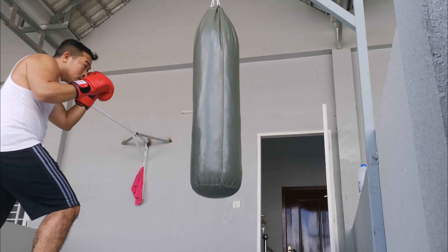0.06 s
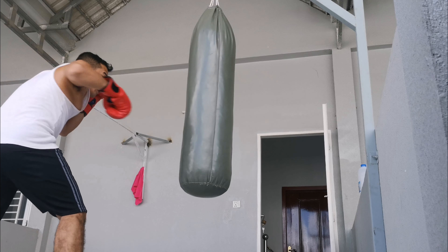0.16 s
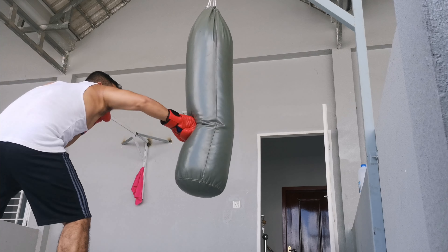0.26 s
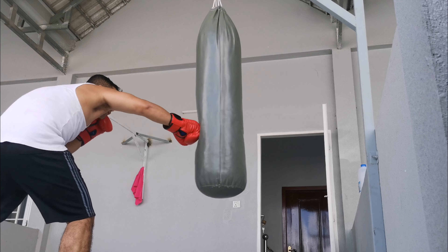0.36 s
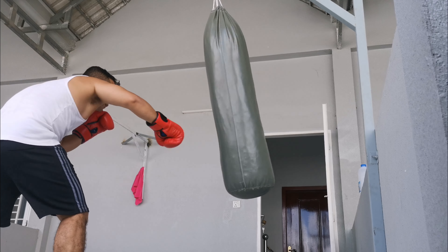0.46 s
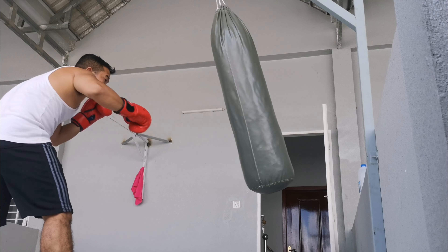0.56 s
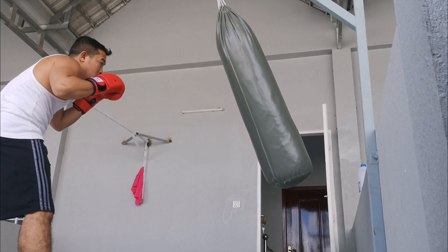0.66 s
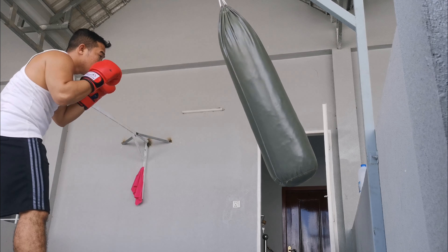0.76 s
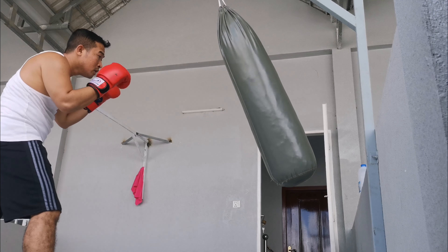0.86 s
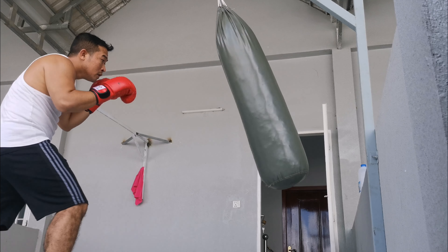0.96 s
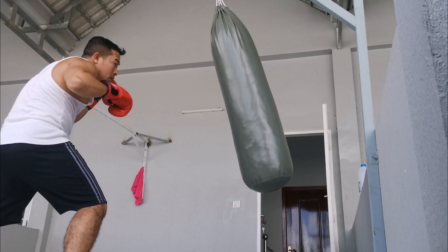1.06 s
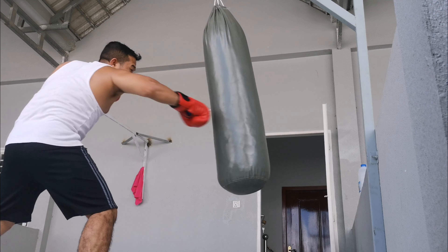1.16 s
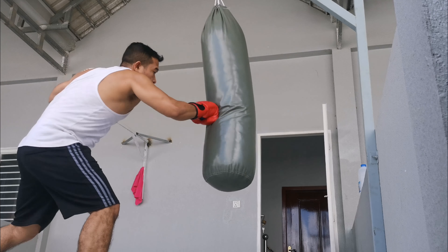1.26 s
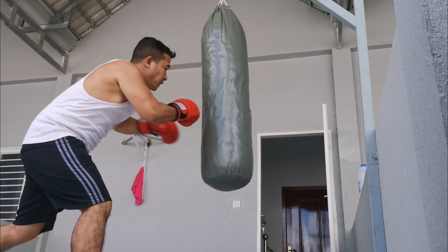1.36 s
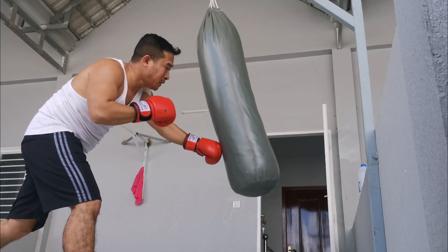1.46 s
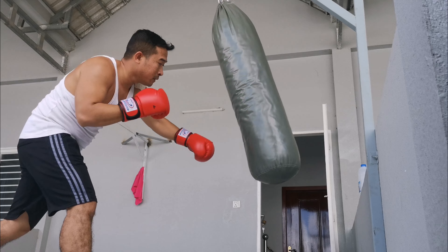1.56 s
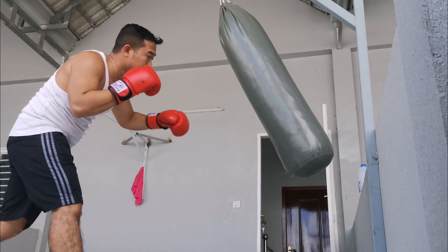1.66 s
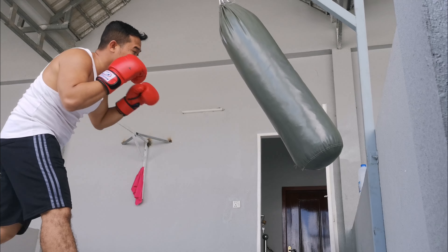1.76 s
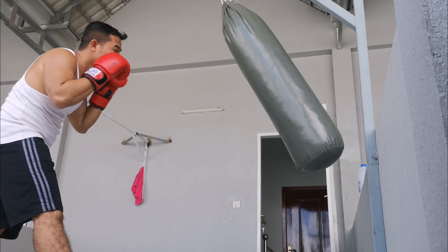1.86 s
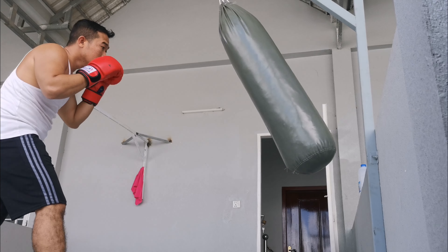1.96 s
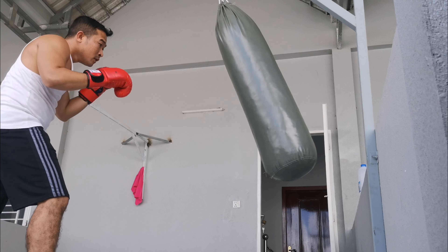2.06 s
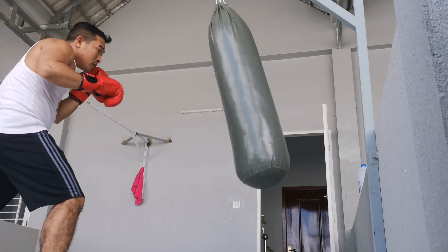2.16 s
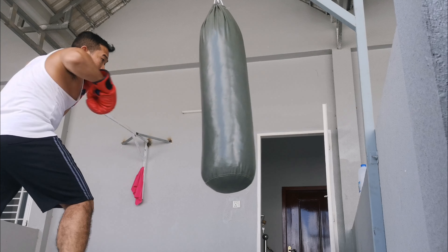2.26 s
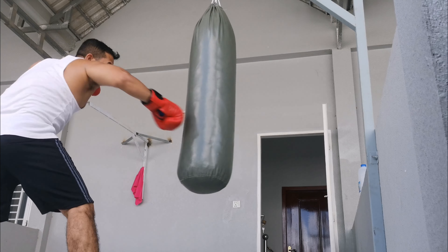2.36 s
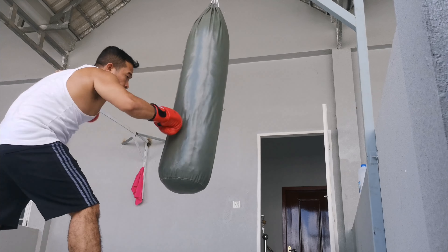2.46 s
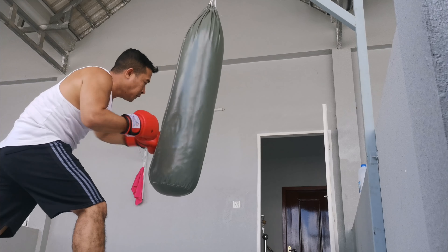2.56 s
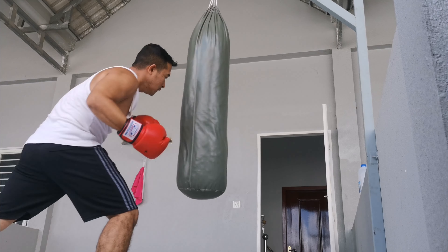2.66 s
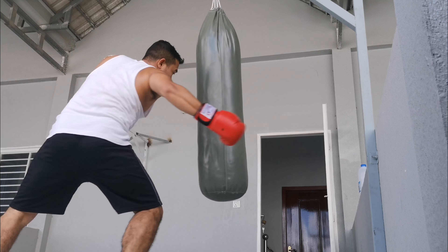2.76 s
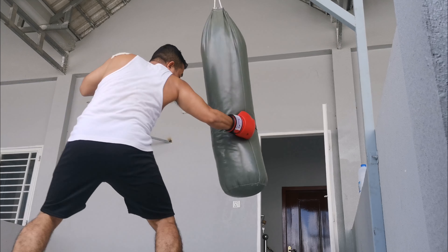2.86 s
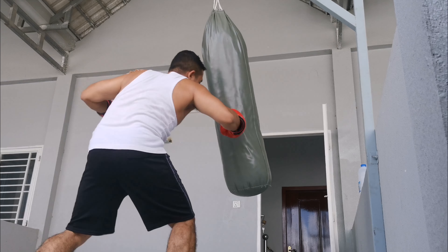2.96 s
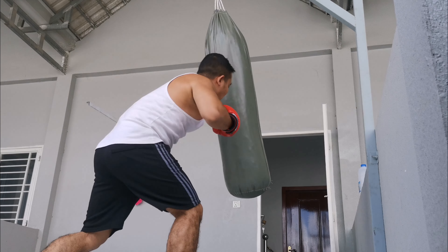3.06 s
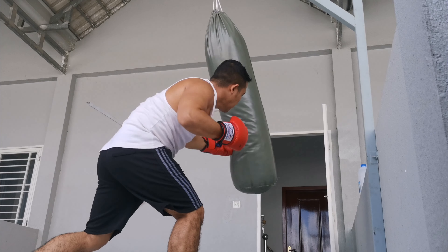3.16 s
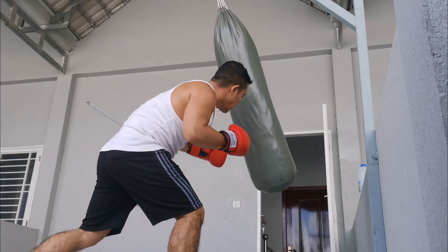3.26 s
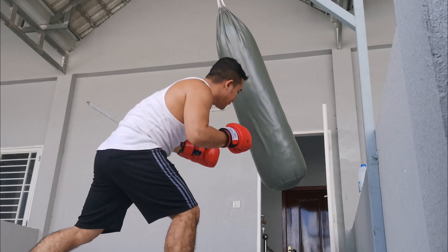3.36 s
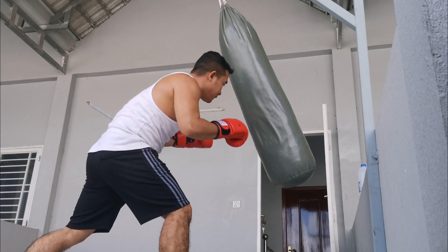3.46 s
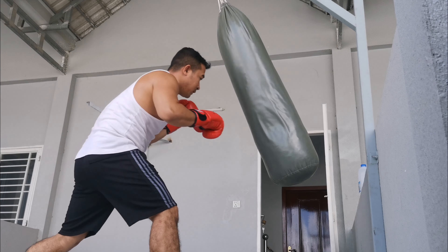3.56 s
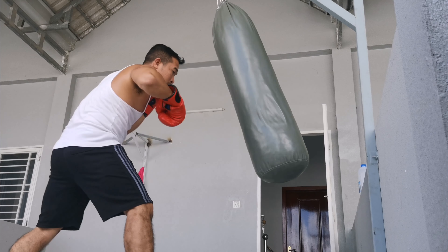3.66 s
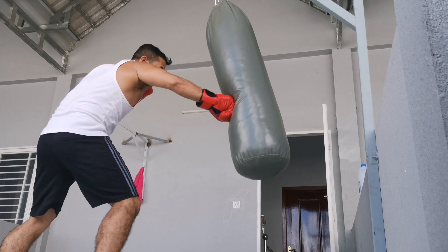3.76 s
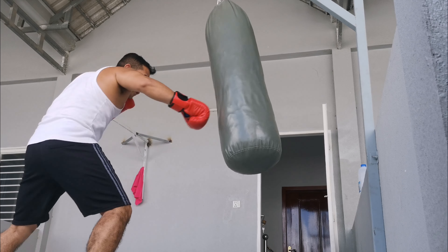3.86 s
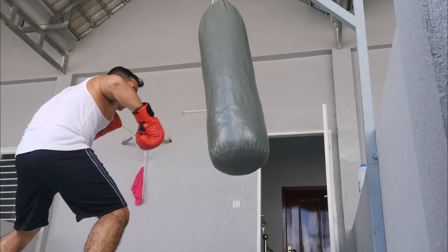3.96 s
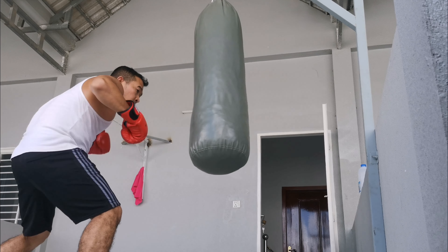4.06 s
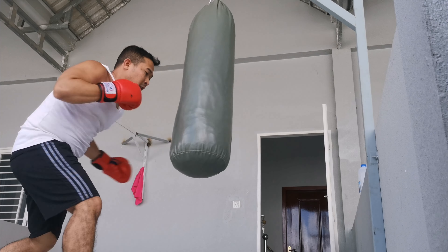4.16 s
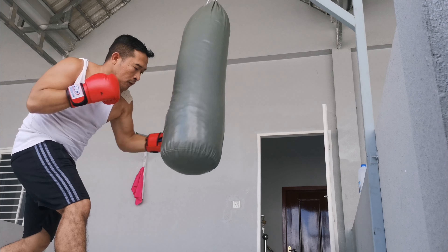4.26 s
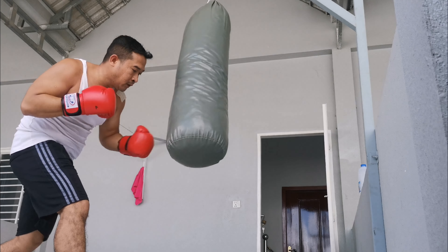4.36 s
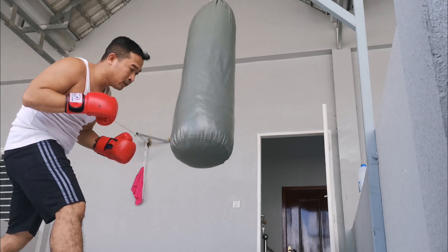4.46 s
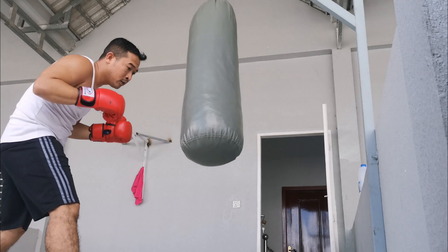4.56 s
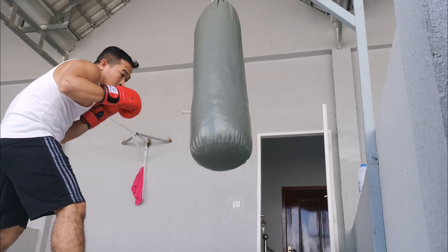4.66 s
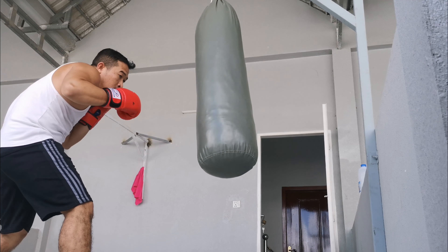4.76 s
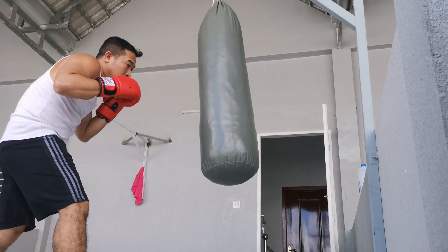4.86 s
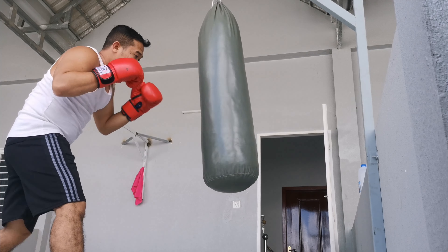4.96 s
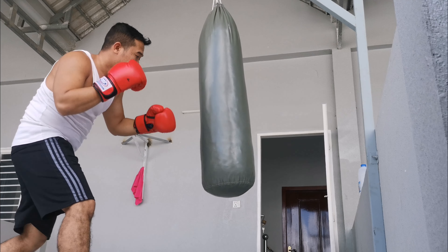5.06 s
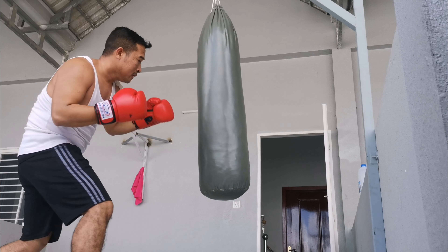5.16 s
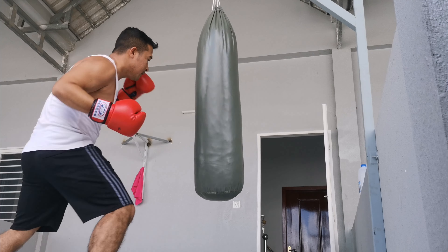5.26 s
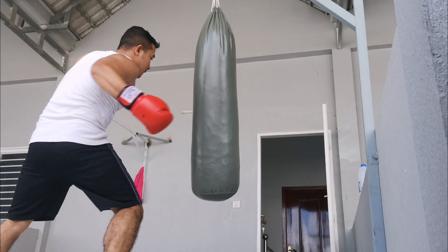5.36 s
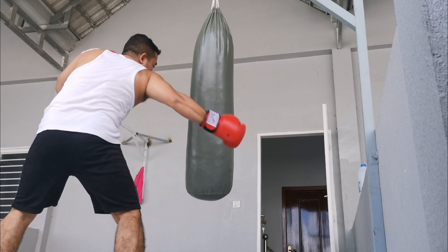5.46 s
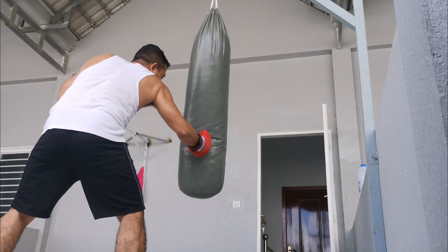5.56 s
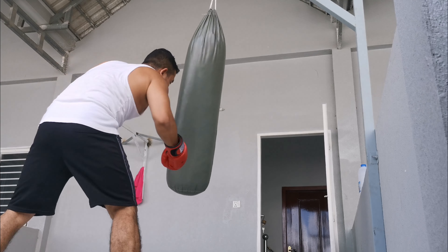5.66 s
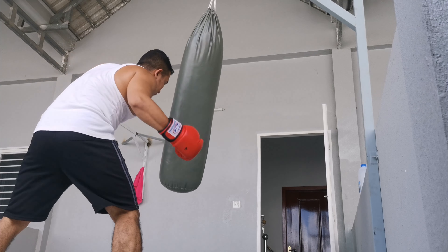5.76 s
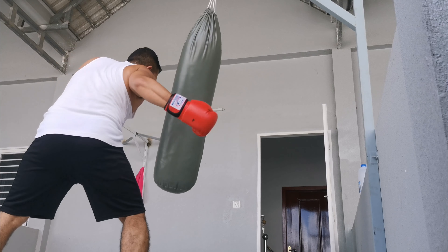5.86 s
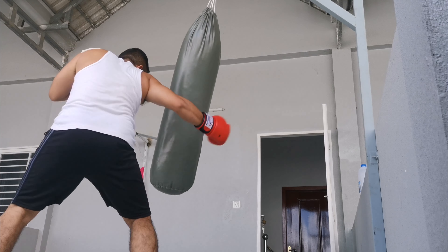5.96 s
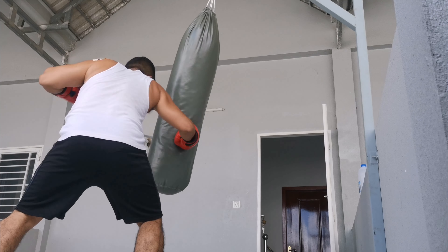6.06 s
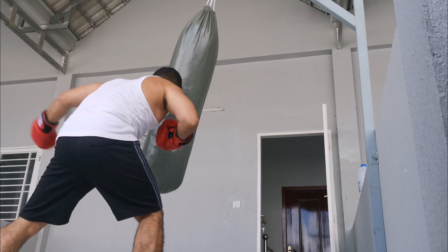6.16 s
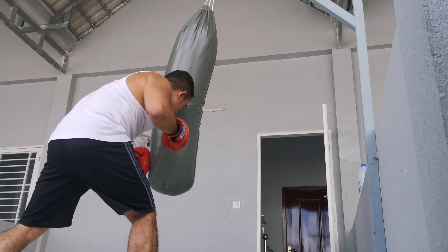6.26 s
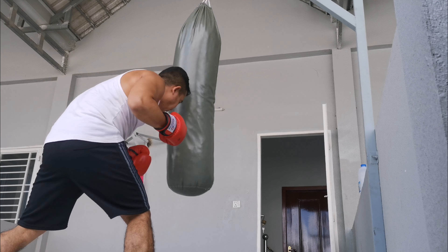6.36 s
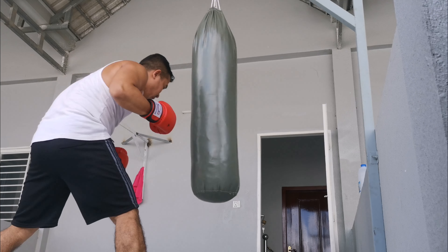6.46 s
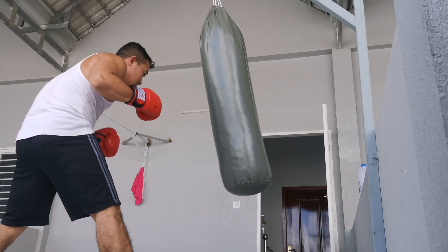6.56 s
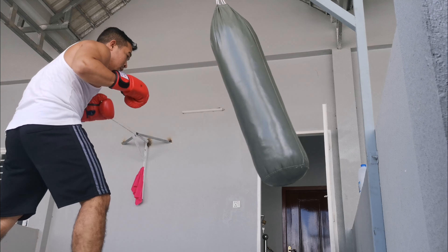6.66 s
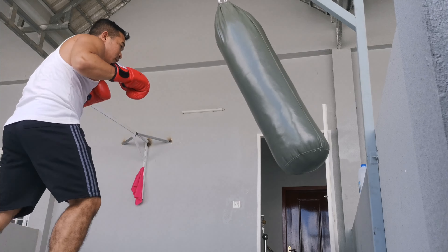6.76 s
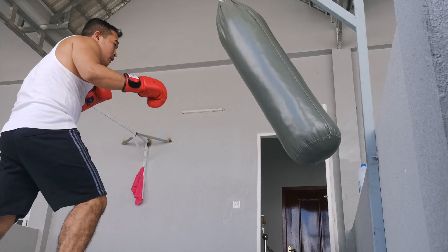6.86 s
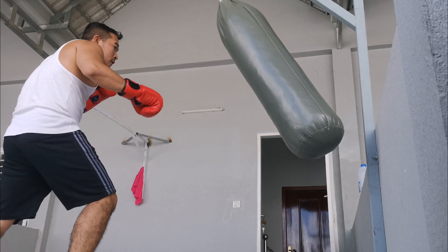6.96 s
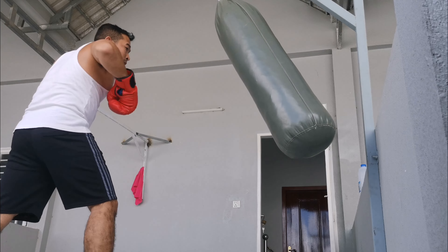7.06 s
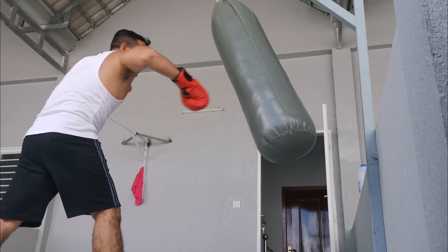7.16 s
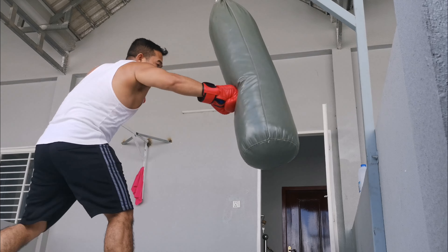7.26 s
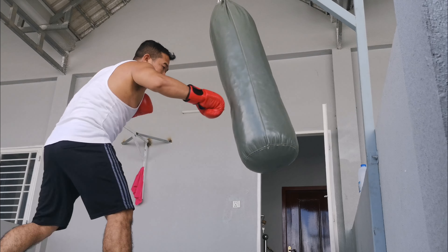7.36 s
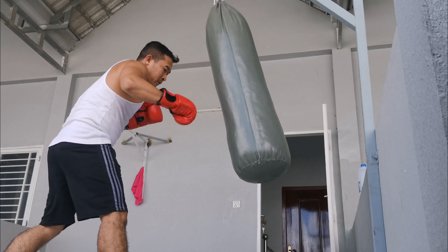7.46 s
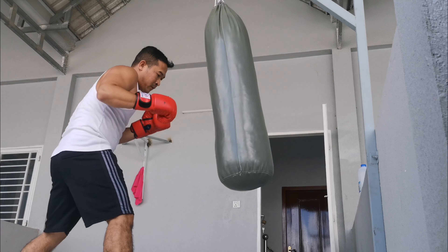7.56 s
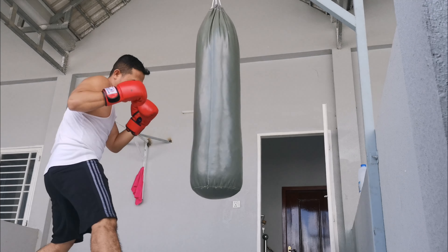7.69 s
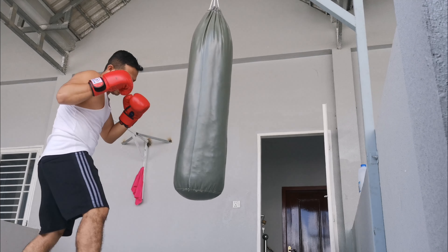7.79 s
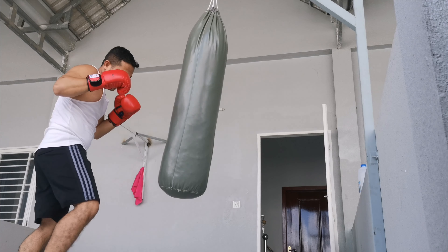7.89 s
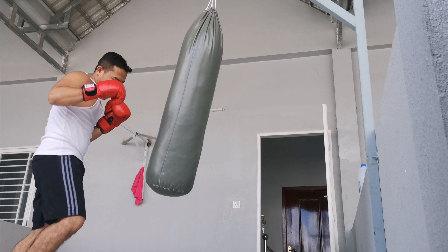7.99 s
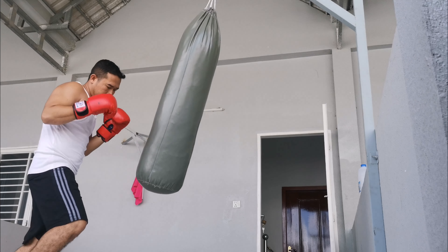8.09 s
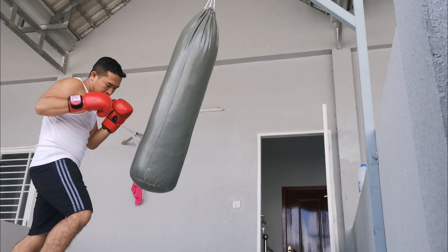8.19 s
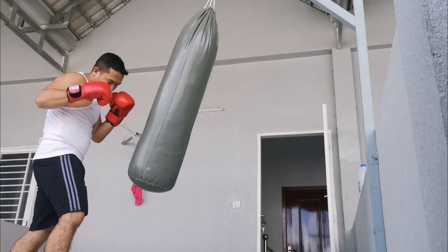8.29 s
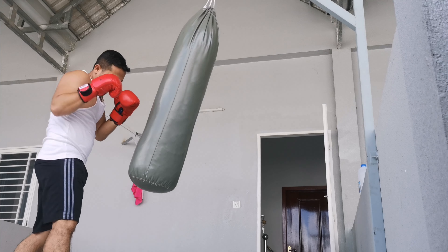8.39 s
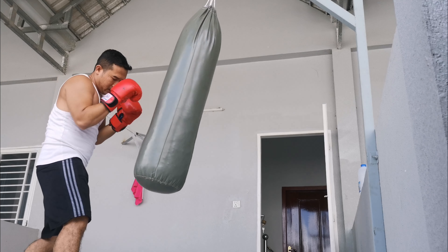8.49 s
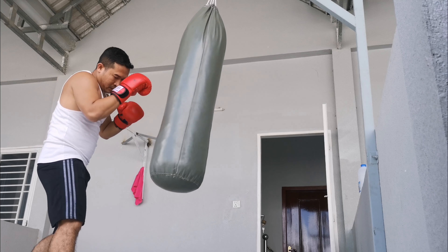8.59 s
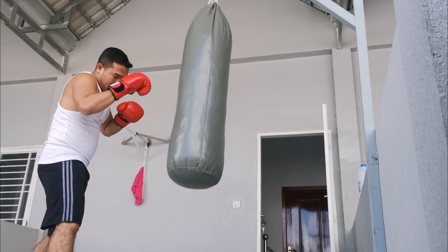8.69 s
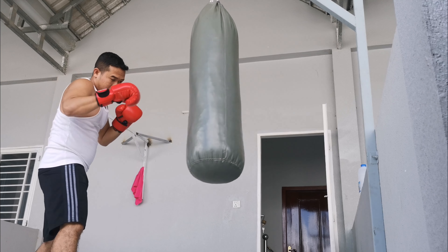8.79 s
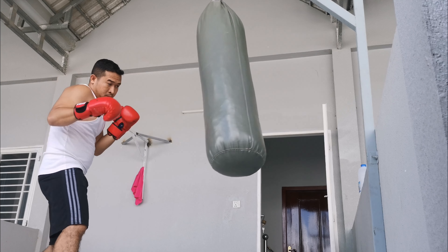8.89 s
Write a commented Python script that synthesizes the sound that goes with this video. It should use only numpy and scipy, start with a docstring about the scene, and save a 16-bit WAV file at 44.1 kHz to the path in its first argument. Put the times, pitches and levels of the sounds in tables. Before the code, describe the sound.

Padded gloves hit a hanging heavy bag on a covered porch with hard walls. Thirteen punches land at uneven intervals, some in quick pairs, each a short low thud with a vinyl slap and a brief boomy ring. Soft foot thumps, light bag touches and a few dry ticks fall between them. The punching stops and a sole faintly scuffs the floor. The microphone is nearby, with quiet street rumble underneath.

```python
"""Padded gloves hit a hanging heavy bag under the roof of a hard-walled porch. Street rumble runs from the
start, lowered by a noise suppressor. From 0.4 s to 7.4 s come thirteen blows, each a short low push of air with
a vinyl slap; walls and roof ring on, and the suppressor cuts the tails. Between blows come small dry ticks and
the thumps of feet and soft touches of the bag; a louder second crack follows close on the blow at 6.42 s. Last,
near 8.6 s, a sole scuffs the floor."""
import sys
import numpy as np
from scipy import signal
from scipy.fft import rfft, irfft
from scipy.io import wavfile
from scipy.ndimage import uniform_filter1d

SR = 44100
rng = np.random.default_rng(int(sys.argv[2]) if len(sys.argv) > 2 else 0)


def master_out(mix):
    """Clip the mix to full scale and print it as 16-bit PCM to the path in sys.argv[1]."""
    frames = np.transpose(np.atleast_2d(mix))
    ceiling = np.clip(frames, -1, 1)
    pcm = np.round(ceiling * 32767).astype(np.int16)
    wavfile.write(sys.argv[1], SR, pcm)


N = 393813

# street spectrum: freq_hz, density_db
STREET_SPECTRUM = [(25, -2), (50, 1), (110, -2), (200, -6.5), (350, -8.5), (550, -15.5), (900, -23),
                   (1300, -31), (1700, -30.5), (3000, -36), (7500, -46), (11000, -55), (15500, -59)]
# left-right likeness of diffuse sound: freq_hz, coherence
COHERENCE = [(60, 1), (250, 0.97), (500, 0.63), (1000, 0.5), (2000, 0.065), (4000, 0.05), (8000, 0.97),
             (15000, 0.25)]
# balance of diffuse sound: freq_hz, left_over_right_db
BALANCE = [(60, 2), (180, -4.5), (550, -2.5), (1650, -1.5), (4970, 3), (15000, -5)]
# phase between channels: freq_hz, right_lead_rad
RIGHT_LEAD = [(60, 0.17), (520, 0.21), (860, 2), (1120, 2.2), (1890, 6.9), (2840, 11), (4570, 2.7),
              (5770, 0.11), (16000, .1)]
# blows; where the bag hangs sets the favoured standing wave:
# start_s, push_db, slap_re_push_db, left_over_right_db, contact_ms, favoured_hz, waves_re_push_db
PUNCHES = [(0.4122, -9.5, -9.5, -2, 2.1, 112, -26), (1.371, -6, -17.5, -1.5, 1.97, 172, -26.5),
           (1.5512, -4, -11, 4, 1.9, 105, -24.5), (2.5373, -3, -10, 1, 2.2, 169.5, -28),
           (2.7265, -6.5, -12.5, -4, 1.6, 172, -19.5), (3.026, -2, -16, -3.5, 1.2, 99.5, -32),
           (3.309, -4, -16, -4.5, 2.23, 186, -20.5), (3.9335, -7.5, -11.5, -4, 1.97, 180, -25),
           (4.4201, 2.7, -16, -2.5, 1.7, 176, -31), (5.6642, -3, -15.5, -3, 1.12, 98.5, -26),
           (6.189, -5, -17.5, -4.5, 1.48, 96.8, -21.5), (6.4215, -5.5, -7, -2, 1.7, 98.3, -31.5),
           (7.3827, -9, -12.5, 13.5, 2, 112.5, -26.5)]
# vinyl slap spectrum: freq_hz, level_db
SLAP_SPECTRUM = [(500, -13.5), (1000, 2.5), (1700, 4), (2600, -0.5), (3700, -2), (5000, -6), (7500, -6),
                 (9500, -12.5), (12000, -24.5), (15500, -65)]
# reflections off floor, walls, roof: delay_s, gain_db
ECHOES = [(.010, -12.5), (0.0131, -11), (.020, -7.5), (.028, -7), (.036, -10.5)]
# porch decay: freq_hz, t60_s
PORCH_DECAY = [(60, 0.9), (125, 1.7), (250, 1.9), (500, 1.78), (1000, 1.116), (2000, 0.98), (4000, 0.85),
               (8000, 0.87), (11000, 0.76), (15000, 0.2)]
# low tail spectrum: freq_hz, level_db
LOW_TAIL_SPECTRUM = [(40, -33), (70, -2), (100, -0.5), (170, -2), (300, -2), (450, -8.5), (620, -12),
                     (900, -13.5), (1500, -46.5)]
# standing waves between the walls: freq_hz, level_db, t60_s
WALL_MODES = [(73.6, -2, 0.29), (96.3, -3.5, 1.4), (108.4, -5, 1.6), (154.6, -14, 1.2), (172.6, -5, 1.8),
              (196.5, -5.5, 2.1), (222.8, -5.5, 1.3), (287.1, 0, 0.42), (362, -15.5, 1.6),
              (399, -11.5, 0.94)]
# dry ticks, the last a second crack just after the 6.42 s blow: start_s, peak_db, pitch_hz
TICKS = [(1.349, -37.5, 3020), (3.571, -41.5, 1271), (6.434, -21, 2170)]
# feet and soft touches of the bag: centre_s, peak_db, pitch_hz
THUMPS = [(1.421, -31.5, 402), (1.8318, -21, 600), (4.262, -35, 350), (4.401, -28.5, 280),
          (5.587, -24, 302), (5.619, -22, 220), (6.0153, -33, 650), (6.152, -38, 280), (6.183, -33, 280),
          (8.071, -44, 400), (8.578, -43, 79.9)]
# sole resonances: centre_hz, width_hz, level_db
SOLE_MODES = [(1930, 70, 0), (3050, 120, -4), (2500, 1200, -17)]
# suppressor at full depth: freq_hz, gain_db
SUPPRESSION = [(100, -7.5), (600, -9), (2000, -8), (8000, -7.5)]


def gain_of(db):
    return 10 ** (np.asarray(db) / 20)


def unit_rms(x):
    return x / np.sqrt(np.mean(x ** 2) + 1e-20)


def curve(points, hz):
    freq_hz, value = np.transpose(points)
    return np.interp(np.log(hz + 1), np.log(freq_hz + 1), value)


def add(mix, start_s, sound):
    at = round(start_s * SR)
    part = mix[:, at:at + sound.shape[1]]
    part += sound[:, :part.shape[1]]


def patchiness(count, bins, frames):
    """Smooth random field over frequency and time."""
    field = rng.standard_normal((count // 256 + 5, 513)).T
    return unit_rms(uniform_filter1d(uniform_filter1d(field, bins, axis=0), frames, axis=1))


def diffuse_noise(count, shape_db, size=1024):
    """Partly coherent stereo noise shaped by shape_db(hz, t)."""
    hop = size // 4
    hz, t = np.fft.rfftfreq(size, 1 / SR)[:, None], np.arange(count // hop + 5) * hop / SR
    a, b, c, d = rng.standard_normal((len(t), len(hz), 4)).T
    left, unrelated = a + 1j * b, c + 1j * d
    coherence, lean = curve(COHERENCE, hz), gain_of(curve(BALANCE, hz) / 2)
    right = coherence * left * np.exp(1j * curve(RIGHT_LEAD, hz))
    right += np.sqrt(1 - coherence ** 2) * unrelated
    spectra = np.array([left * lean, right / lean]) * gain_of(shape_db(hz, t))
    return signal.istft(spectra, nperseg=size, noverlap=size - hop)[1][:, :count]


def street(level_db=-46):
    """Distant rumble with drifting patches."""
    drift_db = 0.87 * patchiness(N, bins=10, frames=16)
    rumble = diffuse_noise(N, lambda hz, t: curve(STREET_SPECTRUM, hz) + drift_db)
    return gain_of(level_db) * unit_rms(rumble)


def push(contact_ms):
    """A low thud: a pressure dip, a rebound and a small second hump just after."""
    t_ms = np.arange(2048) / SR * 1000
    dip = -np.sin(np.pi * np.minimum(t_ms / contact_ms, 1) ** .7)
    rebound = 1.2 - 0.35 * contact_ms  # stronger after short contacts
    release = np.maximum(t_ms / contact_ms - 1, 0) / .45
    second_hump = 0.28 * np.exp(-((t_ms - 4.6) / .6) ** 2)
    return dip + rebound * release * np.exp(1 - release) + second_hump


def slap(colour_db):
    """Vinyl meets vinyl: a noise crack of a few milliseconds."""
    t, hz = np.arange(2048) / SR, np.fft.rfftfreq(2048, 1 / SR)
    spectrum = rfft(rng.standard_normal(2048)) * gain_of(colour_db(hz))
    crack = irfft([spectrum, spectrum * np.exp(1j * curve(RIGHT_LEAD, hz))])
    attack = 1 - np.exp(-t / 0.0002)
    decay = np.exp(-t / 0.0017) + 0.084 * np.exp(-t / 0.0078)
    return unit_rms(crack) * attack * decay


def build_up(t, rise_s, end_fade_s=.1):
    return (1 - np.exp(-(t / rise_s) ** 2)) * np.minimum(1, (t[-1] - t) / end_fade_s)


def tail(colour_db, energy, rise_s, count):
    """Dense reflections build up, clump in patches and die band by band."""
    clumps_db = 1.7 * patchiness(count, bins=9, frames=7)
    wash = diffuse_noise(count, lambda hz, t: colour_db(hz) + clumps_db - 60 * t / curve(PORCH_DECAY, hz))
    wash *= build_up(np.arange(count) / SR, rise_s)
    return wash * np.sqrt(2 * energy / (wash ** 2).sum())


def porch(source, tail_energy, cutoff_hz, count):
    """A dense low tail plus single echoes, each reaching one side first."""
    colour_db = lambda hz: curve(LOW_TAIL_SPECTRUM, hz) - 20 * np.log10(1 + (hz / cutoff_hz) ** 4)
    answer = tail(colour_db, tail_energy, rise_s=0.0054, count=count)
    for delay_s, gain_db in ECHOES:
        for side, at in enumerate(round(delay_s * SR) + rng.integers(-14, 15, 2)):
            answer[side, at:at + len(source)] += gain_of(gain_db) * source
    return answer


def standing_waves(favoured_hz, lift_db=6, width_oct=0.18):
    """A blow starts the wall modes, each with its own strength and slow waver."""
    t = np.arange(40000) / SR
    waves = np.zeros(len(t))
    for hz, level_db, t60_s in WALL_MODES:
        strength, detune, phase, rate = rng.standard_normal(4)
        favour_db = lift_db * np.exp(-(np.log2(hz / favoured_hz) / width_oct) ** 2)
        envelope = gain_of(level_db + 2 * strength + favour_db - 60 * t / t60_s)
        waver = 1 + 0.84 * np.cos(2 * np.pi * 6.5 * rate * t)
        waves += envelope * waver * np.sin(2 * np.pi * hz * (1 + .015 * detune) * t + 3 * phase)
    return waves * build_up(t, rise_s=0.0055) * gain_of([[-1.2], [1.2]])


def punches():
    """Glove on bag: panned push and slap, then the porch's answer."""
    mix = np.zeros((2, N))
    for start_s, push_db, slap_db, pan_db, contact_ms, favoured_hz, waves_db in PUNCHES:
        tilt_db_per_oct = -0.5 - 0.0424 * push_db  # harder blows slap duller
        colour_db = lambda hz: curve(SLAP_SPECTRUM, hz) + tilt_db_per_oct * np.log2(hz / 3000 + .01)
        thud = gain_of(push_db) * push(contact_ms)
        crack = gain_of(push_db + slap_db) * slap(colour_db)
        add(mix, start_s, (thud + crack) * gain_of([[pan_db / 2], [-pan_db / 2]]))
        low_energy = gain_of(-4) ** 2 * (thud ** 2).sum()
        add(mix, start_s, porch(0.47 * thud + 0.7 * crack[0], low_energy, cutoff_hz=3000, count=40000))
        tail_re_slap_db = -2 - 0.18 * slap_db  # a weaker crack leaves a larger share to the tail
        bright_energy = gain_of(tail_re_slap_db) ** 2 * (crack ** 2).sum() / 2
        add(mix, start_s, tail(colour_db, bright_energy, rise_s=0.015, count=25000))
        add(mix, start_s, gain_of(push_db + waves_db) * standing_waves(favoured_hz))
    return mix


def ticks(t60_s=0.0088):
    """Short dry rings."""
    mix, t = np.zeros((2, N)), np.arange(2048) / SR
    for start_s, peak_db, pitch_hz in TICKS:
        tick = gain_of(peak_db - 60 * t / t60_s) * np.sin(2 * np.pi * pitch_hz * t)
        add(mix, start_s, np.array([tick, tick]))
    return mix


def thumps(swell_s=.023):
    """Feet and bag touches: soft one-cycle pushes that the porch answers."""
    mix, t = np.zeros((2, N)), np.arange(2048) / SR
    for centre_s, peak_db, pitch_hz in THUMPS:
        phase_rad = 2 * np.pi * pitch_hz * (t - swell_s)
        thump = -gain_of(peak_db) * np.cos(phase_rad) * np.exp(-(phase_rad / 3.6) ** 2)
        answer = porch(0.34 * thump, 2.3 * (thump ** 2).sum(), cutoff_hz=2 * pitch_hz, count=14000)
        add(mix, centre_s - swell_s, np.array([thump, thump]))
        add(mix, centre_s - swell_s, answer)
    return mix


def scuff(start_s=8.555, rise_s=.035, t60_s=.4, level_db=-58):
    """A sole twists on the floor; rubbing noise rings it, swells and fades."""
    mix, t, hz = np.zeros((2, N)), np.arange(16384) / SR, np.fft.rfftfreq(16384, 1 / SR)
    resonance = sum(gain_of(db) / (1 + ((hz - centre_hz) / (width_hz / 2)) ** 2)
                    for centre_hz, width_hz, db in SOLE_MODES)
    rub = unit_rms(irfft(rfft(rng.standard_normal((2, len(t)))) * resonance))
    envelope = np.minimum(t / rise_s, 1) * gain_of(level_db - 60 * np.maximum(t - rise_s, 0) / t60_s)
    add(mix, start_s, rub * envelope)
    return mix


def suppressor(x, threshold_db=8.5):
    """Lowers each band as it sinks towards its steady background."""
    hz, _, spectra = signal.stft(x, SR, nperseg=512, noverlap=384)
    power = (abs(spectra) ** 2).mean(0)
    power = uniform_filter1d(uniform_filter1d(power, 3, axis=0), 9, axis=1) + 1e-20
    over_db = 10 * np.log10(power / np.percentile(power, 15, axis=1, keepdims=True))
    near_db = uniform_filter1d(over_db, 11, axis=0)
    broad_db = over_db[8:90].mean(0)  # 0.7-7.7 kHz
    raised_db = 0.32 * signal.lfilter([.004], [1, -.996], broad_db)  # loud spells lift the threshold
    margin_db = (near_db + broad_db) / 2 - threshold_db - raised_db
    opened = 1 / (1 + np.exp(-margin_db))
    gain = gain_of(curve(SUPPRESSION, hz)[:, None] * (1 - opened))
    return signal.istft(spectra * gain, SR, nperseg=512, noverlap=384)[1][:, :N]


def scene():
    return punches() + ticks() + thumps() + street() + scuff()


def record(dry, low_cut_hz=48, band_limit_hz=16100):
    """Suppressor, low cut, overload, band limit."""
    low_cut = signal.butter(2, low_cut_hz, "high", fs=SR, output="sos")
    clipped = np.clip(signal.sosfiltfilt(low_cut, suppressor(dry)), -1, 1)
    band_limit = signal.firwin(511, band_limit_hz, window=("kaiser", 9), fs=SR)
    return signal.oaconvolve(clipped, band_limit[None], "same")


dry = scene()
out = record(dry)
master_out(out)
```